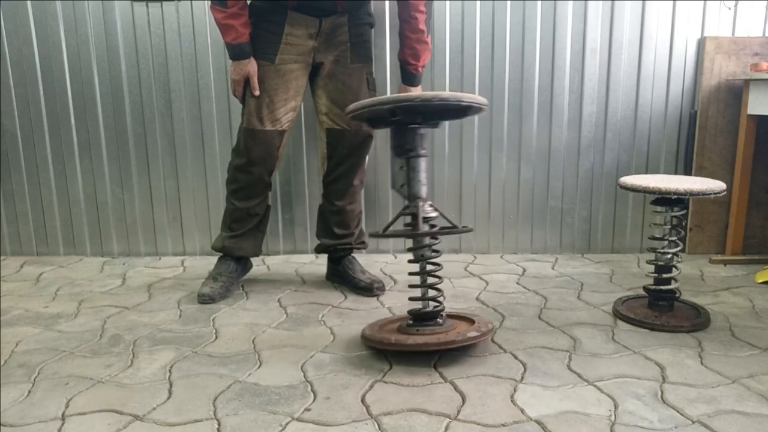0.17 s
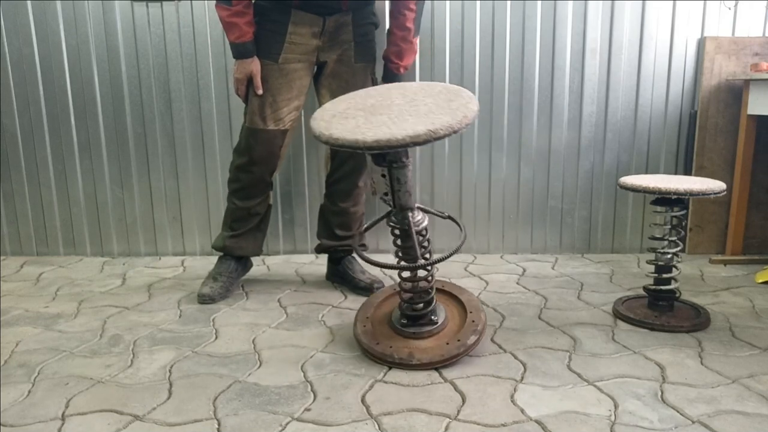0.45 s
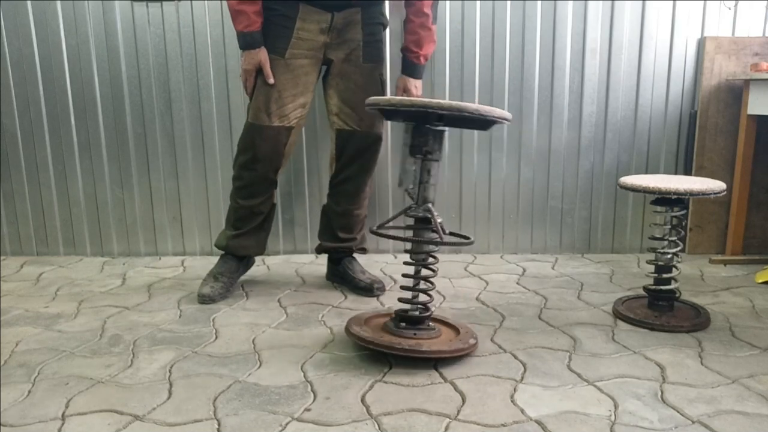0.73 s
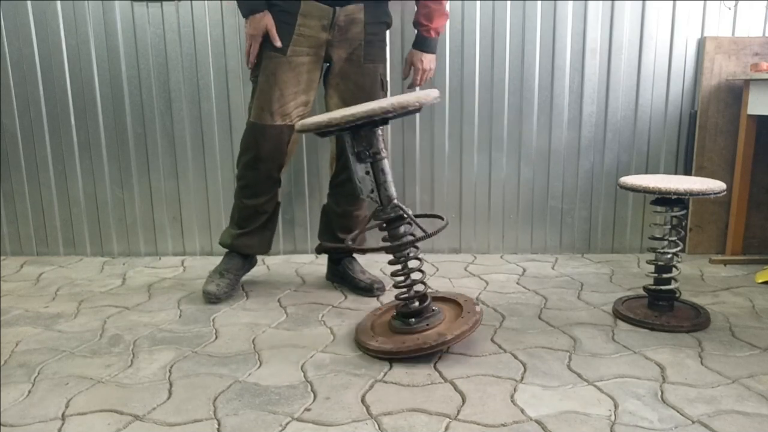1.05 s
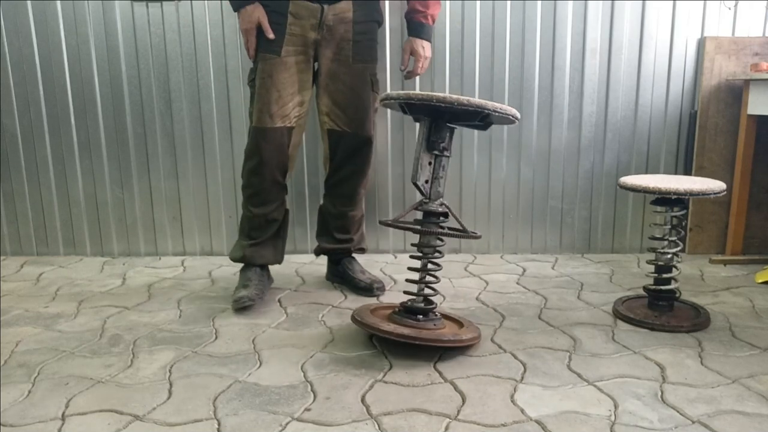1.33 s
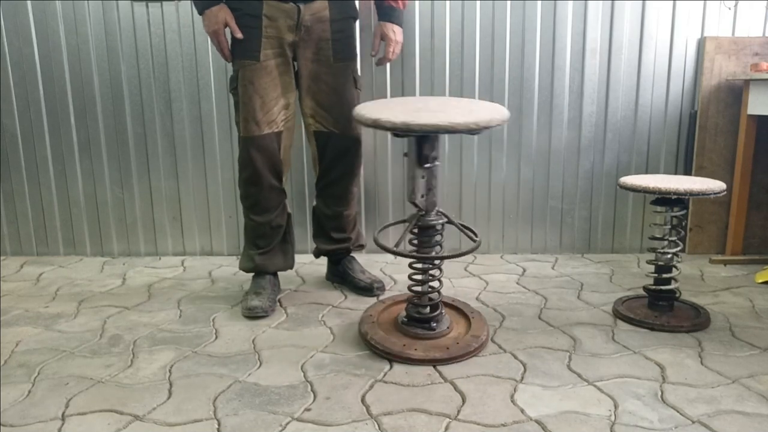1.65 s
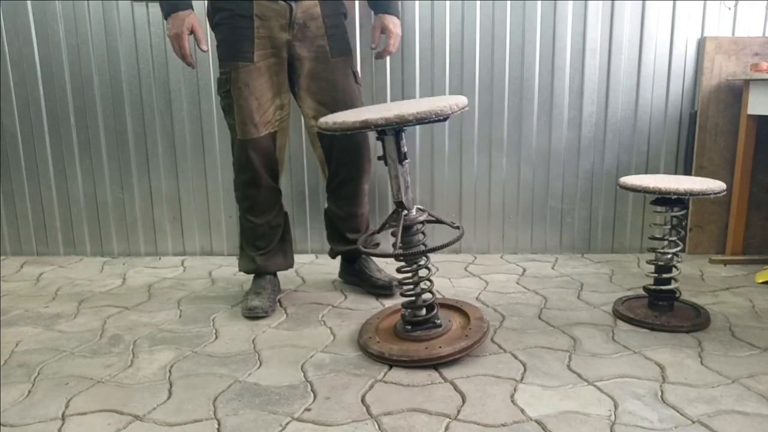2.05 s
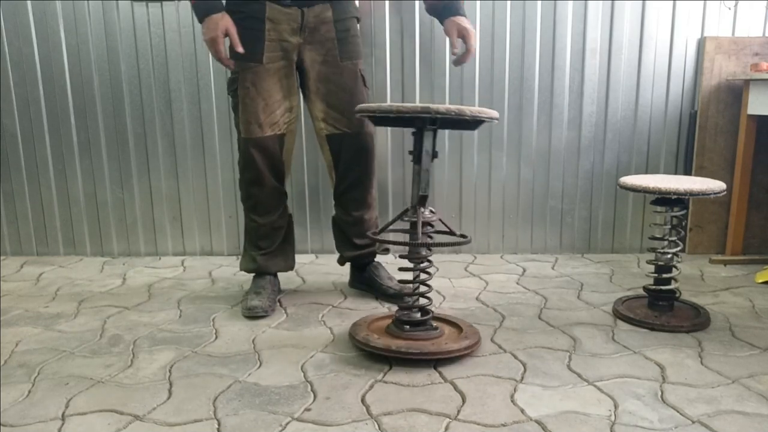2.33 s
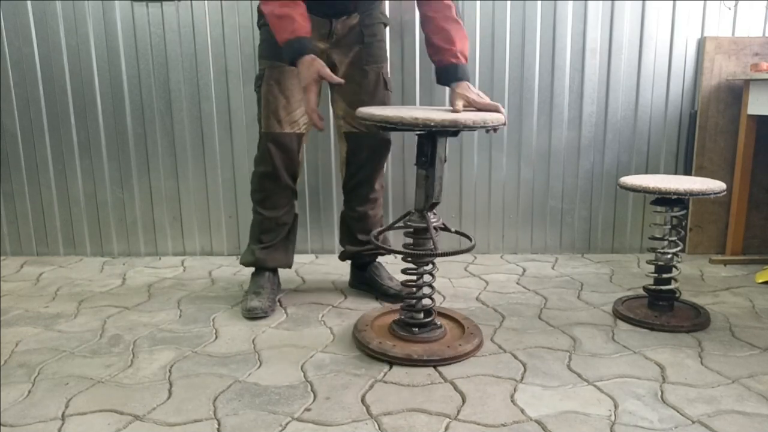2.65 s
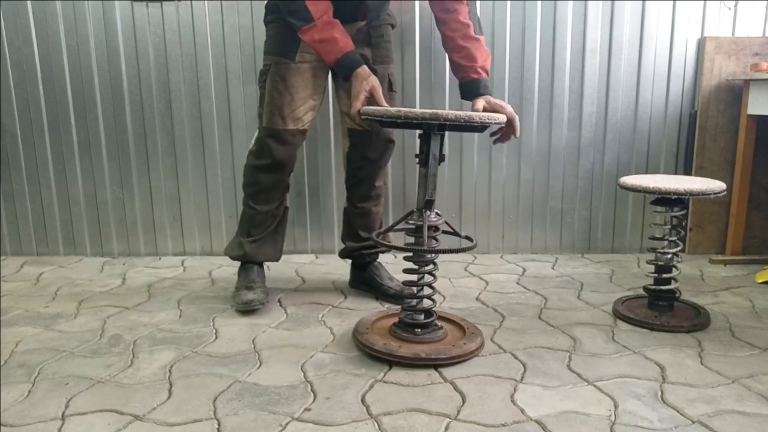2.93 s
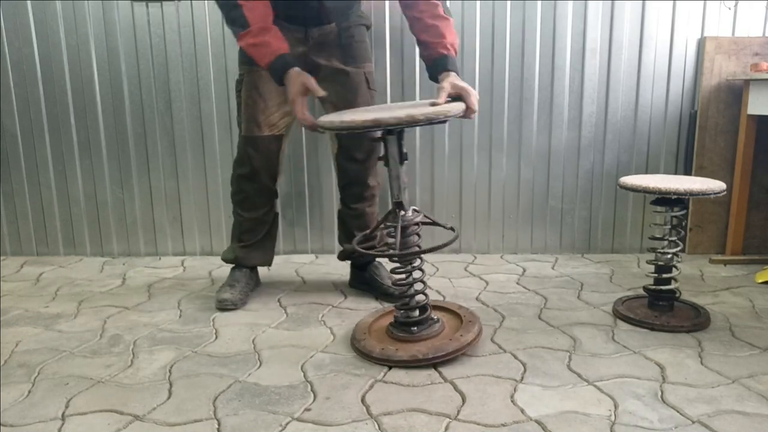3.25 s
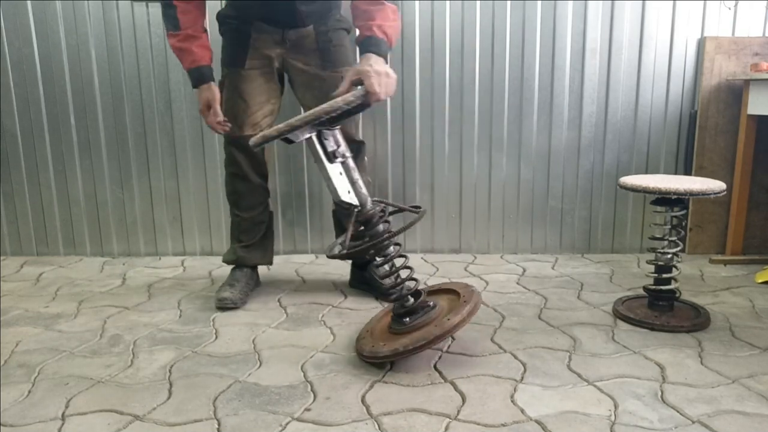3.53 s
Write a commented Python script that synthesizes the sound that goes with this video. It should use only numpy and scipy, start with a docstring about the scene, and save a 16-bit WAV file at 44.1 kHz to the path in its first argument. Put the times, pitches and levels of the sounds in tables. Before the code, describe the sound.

A heavy steel disc under a stool wobbles on its rim over concrete paving. After a quieter start, rumble and knocks swell around 0.3 s, crack brightly at 0.8 s, clatter densely at 1.3-1.5 s, and surge at 1.8, 2.1, 2.4 and 2.7-2.9 s, with grit crunch and ringing pings. At 3.2 s loose parts clank harshly, then the ring fades into faint outdoor air. Close, loud, somewhat clipped, with short yard reverberation.

```python
"""A stool on a heavy steel disc wobbles round on its rim over concrete paving in a yard with sheet-metal walls.
The rim rumbles over random tiny bumps and knocks over the joints; short pushes set the disc and frame ringing.
Grains of noise make the crunch of grit, decaying sines the singing disc, and harsh ringing blows the loose parts.
It swells with each swing, and a last clank dies away as the stool is caught and tipped, over faint outdoor noise."""
import sys
import numpy as np
from scipy import signal
from scipy.fft import rfft, irfft, next_fast_len
from scipy.io import wavfile

SR = 44100
rng = np.random.default_rng(int(sys.argv[2]) if len(sys.argv) > 2 else 0)


def waveform_to_disk(signal):
    """Save audio, clipped to [-1, 1], as 16-bit WAV at the path in sys.argv[1]."""
    frames = np.transpose(np.atleast_2d(signal))
    scaled = np.clip(frames, -1, 1) * 32767
    samples = np.round(scaled).astype(np.int16)
    wavfile.write(sys.argv[1], SR, samples)


N = 160965   # length of the sound in samples
LEAD_S = .2   # run-up made ahead of the start, so that earlier contacts can ring on into it
SPAN = next_fast_len(N + int(1.6 * SR))   # working length in samples, with room for run-up and tails
KNOCK_S = 0.052   # time over which the level of a knock or clank is counted


def from_db(db):
    """Turn decibels into a gain."""
    return 10 ** (np.asarray(db) / 20)


def rms_one(x):
    """Scale to an average power of one."""
    return x / np.sqrt(np.mean(np.abs(x) ** 2) + 1e-20)


def bins(size):
    """Frequencies of a spectrum in Hz, none below 1 so that their logarithm exists."""
    return np.maximum(np.arange(size // 2 + 1) * SR / size, 1)


def at_hz(points, hz):
    """Read a curve of (frequency, value) points on a logarithmic frequency axis."""
    point_hz, values = np.transpose(points)
    return np.interp(np.log(hz), np.log(point_hz), values)


def in_time(rows):
    """Read each column of a curve over time at every sample, run-up included."""
    row_s, *columns = np.transpose(rows)
    time_s = np.arange(SPAN) / SR - LEAD_S
    return [np.interp(time_s, row_s, column) for column in columns]


def sample_at(time_s):
    """Place of a moment in the working signal, run-up included."""
    return int((time_s + LEAD_S) * SR)


def causal(db):
    """Minimum-phase filter with the given gains: nothing sounds before its cause."""
    cepstrum = irfft(np.log(from_db(db)))
    half = len(cepstrum) // 2
    # folding the second half onto the first gives the phase that belongs to these gains
    cepstrum[1:half] *= 2
    cepstrum[half + 1:] = 0
    return np.exp(rfft(cepstrum))


def grains(per_s, spread_db):
    """Clicks of uneven size and random sign at random moments, scaled to unit power."""
    boost_db = spread_db * np.minimum(rng.exponential(1, SPAN), 4)
    sizes = from_db(boost_db) * rng.choice([-1, 1], SPAN)
    return rms_one(sizes * (rng.random(SPAN) < per_s / SR))


def coloured(x, points):
    """Filter a signal with a frequency curve, then scale it to unit power."""
    return rms_one(irfft(rfft(x) * causal(at_hz(points, bins(SPAN))), SPAN))


def response(colour, modes):
    """A steel part's broad colour, shaped further by its narrow resonances."""
    hz = bins(SPAN)
    out = causal(at_hz(colour, hz))
    for centre_hz, width_hz, height_db in modes:
        resonance = 1 / (1 + 1j * (hz ** 2 - centre_hz ** 2) / (hz * width_hz))
        out = out * (1 + (from_db(height_db) - 1) * resonance)
    return rms_one(out)


def dying_noise(t60_s, build_s):
    """A dense ring as noise that builds up, then falls by 60 dB in t60_s; unit power over a second."""
    t = np.arange(SR) / SR
    return rms_one(rng.standard_normal(SR) * from_db(-60 * t / t60_s) * np.minimum(t / build_s, 1))


def spread():
    """What follows a contact at one place: the frame's dense short ring and the yard's reverberation."""
    frame = from_db(-3) * dying_noise(t60_s=0.14, build_s=0.0011)
    yard = from_db(-4.5) * dying_noise(t60_s=0.86, build_s=0.018)
    return (frame + yard) / np.sqrt(SR)


def outdoor_air():
    """The faint outdoor background: steady noise, strongest in the bass."""
    # colour of the background: hz [Hz], relative_level_db [dB]
    air_colour = [(25, -21), (60, -2.5), (100, 7.5), (300, 0), (1000, -10), (4000, -37.5), (9000, -44),
                  (16000, -36)]
    return from_db(-45) * coloured(rng.standard_normal(SPAN), air_colour)


def grit():
    """Fine crunch of sand under the rim: thousands of tiny clicks a second, rising and falling."""
    # sand crushed under the rim: time_s [s], relative_level_db [dB]
    grit_levels = [(0.0, -52), (0.03, -62), (0.25, -58.5), (0.28, -48), (0.29, -52), (0.4, -45),
                   (0.58, -59), (0.7, -57), (0.72, -50), (0.82, -41.5), (0.94, -46.5), (1.09, -40),
                   (1.28, -52.5), (1.29, -41), (1.59, -54), (1.61, -44), (1.78, -51.5), (1.79, -50.5),
                   (1.98, -54.5), (2.02, -58), (2.03, -48), (2.04, -76), (2.07, -40), (2.33, -54.5),
                   (2.4, -43), (2.44, -50.5), (2.74, -39), (2.95, -42), (3.13, -53), (3.16, -46),
                   (3.19, -43), (3.39, -55), (3.61, -63), (3.65, -44)]
    # its colour: hz [Hz], relative_level_db [dB]
    grit_colour = [(1500, -16.5), (3000, 6), (4500, 1.5), (5100, -11), (5550, 3), (5950, -5), (6700, 6),
                   (7000, 2.5), (7300, 6.5), (7600, 3.5), (7750, -10), (8450, -5.5), (8650, -34),
                   (11300, -37), (12000, -15.5), (16000, -20.5)]
    level_db, = in_time(grit_levels)
    crunch = coloured(grains(per_s=7000, spread_db=4), grit_colour)
    return from_db(level_db - 0.5) * crunch


def pings():
    """Edge-on touches set the disc's high partials singing: dying sines, mixed differently each time."""
    # touches: start_s [s], relative_level_db [dB], extra level of the two lowest partials low_db [dB]
    touches = [(.234, -39, -5), (.279, -44, 15), (.805, -36, 7), (1.398, -40, 16.5), (1.601, -41, -6),
               (1.784, -36, -9), (2.03, -34, 1.5), (2.406, -37, 5.5)]
    # partials of the disc: hz [Hz], relative_level_db [dB], time to fall by 60 dB t60_s [s]
    partials = [(2625, -0.5, 0.66), (2696, -3.5, 0.86), (3965, -4, .6), (3980, -3, 0.4), (4600, -12, .6),
                (5580, -20.5, .6), (6650, -19.5, .6), (7280, -18.5, 0.49)]
    spread_db, attack_s = 2, .002
    out = np.zeros(SPAN)
    t = np.arange(SR) / SR
    attack = np.minimum(t / attack_s, 1)
    for start_s, level_db, low_db in touches:
        start = sample_at(start_s)
        for k, (hz, partial_db, t60_s) in enumerate(partials):
            strength_db = level_db + partial_db + low_db * (k < 2) + spread_db * rng.standard_normal()
            fading = from_db(strength_db - 60 * t / t60_s)
            out[start:start + SR] += fading * np.sin(2 * np.pi * hz * t) * attack
    return out


def clanks():
    """Loose steel parts under the seat clank as it is caught and tipped: blows with a harsh, wide ring."""
    # blows: start_s [s], level_db [dB]
    blows = [(2.879, -16), (3.168, -21.5), (3.177, -8.5), (3.183, -17), (3.209, -14.5), (3.243, -17),
             (3.297, -22.5), (3.382, -32), (3.431, -35.5)]
    # broad colour of the loose parts: hz [Hz], relative_level_db [dB]
    clank_colour = [(24, -80.5), (40, -56), (86, -19.5), (156, -16), (187, -13), (294, -13.5), (329, -15),
                    (462, -2), (815, -11), (955, -9.5), (1050, -10), (1610, -6), (1800, -18.5),
                    (2060, -15.5), (2420, -20), (2650, -13.5), (3100, -28.5), (4560, -25), (5220, -46.5),
                    (7340, -41.5), (9000, -66), (11700, -93), (19800, -120)]
    # their resonances: centre_hz [Hz], width_hz [Hz], height_db [dB]
    clank_modes = [(454.4, 22, 4.5), (612, 19, 6.5), (980, 36, 8), (1380, 26, 0), (1602, 25, 4),
                   (2582, 53, 10.5)]
    click_db = -11   # the first impact, ahead of the ring
    sound = 0
    for start_s, level_db in blows:
        blow = np.zeros(SPAN)
        blow[sample_at(start_s)] = from_db(level_db) * np.sqrt(KNOCK_S * SR)
        sound = sound + rfft(blow) * (from_db(click_db) + rfft(spread(), SPAN))
    # the added end point holds the colour flat above 11 kHz
    colour = list(clank_colour) + [(11000, -82.5)]
    return irfft(sound * response(colour, clank_modes), SPAN)


def rolling_force():
    """The rim rides over tiny bumps, its loudness and its treble each changing over time."""
    # the rim rolling on the stone: time_s [s], level_db [dB], treble gain bright_db [dB]
    rolling = [(0, -38.5, -3), (.14, -43.5, -3), (.16, -19, -22), (.22, -22.5, -22.5), (.30, -20.5, 5.5),
               (.35, -11.5, -0.5), (.43, -11, -1.5), (.50, -20.5, 1), (.58, -34, -0.5), (.70, -37.5, 4),
               (.76, -12, 0), (.83, -20.5, -0.5), (.94, -26, 2.5), (1.0, -10, -0.5), (1.09, -13.5, -2),
               (1.15, -16, -3), (1.27, -18, -10.5), (1.33, -13, 4.5), (1.43, -23.5, 0.5), (1.52, -19.5, 3),
               (1.59, -27, 3.5), (1.67, -9.5, -14.5), (1.76, -10.5, -16.5), (1.83, -7.5, -15),
               (1.88, -23.5, -10), (2.02, -21.5, -15), (2.08, -8, -1.5), (2.15, -14, 1), (2.23, -26.5, 4.5),
               (2.32, -33.5, 6), (2.40, -17, 5), (2.48, -25, 1.5), (2.58, -15, 3.5), (2.68, -7.5, -9),
               (2.79, -8, -7), (2.91, -12.5, -1.5), (3.0, -26, 3), (3.14, -37.5, 9.5), (3.21, -25, 4),
               (3.30, -36, -1.5), (3.42, -40.5, 0), (3.52, -62, 10), (3.65, -36, -2)]
    level_db, bright_db = in_time(rolling)
    before_end = np.arange(SPAN) < N + LEAD_S * SR
    bumps = grains(per_s=900, spread_db=3) * from_db(level_db) * before_end
    # share of the treble: none below 560 Hz, all above 1140 Hz
    treble_share = at_hz([(560, 0), (1140, 1)], bins(SPAN))
    treble = irfft(rfft(bumps) * treble_share, SPAN)
    return bumps + (from_db(bright_db) - 1) * treble


def knock_force(level_db, thud_db, clang_db, ring_db, ping_db, size=2048):
    """One short push, coloured by how and where the rim lands."""
    colour = [(190, thud_db), (420, 0), (960, 0), (1700, clang_db),   # frequencies in Hz
              (2745, ring_db), (3470, ping_db), (4830, ping_db), (7000, 0)]
    push = irfft(causal(level_db + at_hz(colour, bins(size))))
    return push * np.sqrt(KNOCK_S * SR)


def stool(places=12):
    """Bumps and knocks fall on places round the rim; each place spreads differently, all share the resonances."""
    # the rim knocks on joints and the frame clatters: start_s [s], level_db [dB], thud_db [dB], clang_db [dB],
    # ring of the rim ring_db [dB], high ping ping_db [dB], extra snap of the first impact snap_db [dB]
    knocks = [(-.07, -18, -2.5, -6.5, -4.5, -16.5, 4), (.154, -26.5, 0.5, -6.5, -5.5, -7, -3),
              (.233, -14.5, -3.5, -8.5, -8, -3, 4), (.279, -18.5, -0.5, 10.5, 7, -6, 4),
              (.339, -14, 1, -5, -1, -12, -3.5), (.396, -18, 2.5, 11, 5.5, -2, -13),
              (.542, -31, -6, 15.5, -14, -6.5, -0.5), (.713, -13.5, -0.5, 1, 5.5, 0, -6.5),
              (.756, -16, 16, -16.5, -7, -4.5, -1), (.804, -7, -6, 1, 8.5, 6.5, -5),
              (.820, -18, 1, -3, -3, -0.5, -18), (.852, -16, -5.5, 9, 11, 8, -4.5),
              (.867, -20, -16.5, 7.5, -6.5, -5.5, -5.5), (.910, -23.5, -3.5, 15, 5.5, 11, 5.5),
              (.961, -19.5, -3.5, -5.5, -1.5, 1.5, -7), (1.024, -23.5, -7, -1.5, -8, -4.5, -11.5),
              (1.076, -15, 11, -12, -16, -3.5, -9.5), (1.140, -26, 3.5, -9, -4.5, 1, -2.5),
              (1.168, -23, 8.5, 1.5, -8, -6.5, -4.5), (1.290, -10, 5.5, 4, -4, 2, -4.5),
              (1.331, -9.5, -2, -5.5, -0.5, -6.5, -9.5), (1.378, -10.5, -11.5, 1.5, 7.5, 6.5, -20),
              (1.398, -18, -11.5, -1.5, 10.5, 3.5, -6), (1.421, -19, -5.5, 7, 17, 1.5, -2),
              (1.454, -22.5, -10, 7, 16, 4, -17), (1.505, -19.5, -18, 2.5, 7.5, 0, -22),
              (1.602, -24, 3.5, -7, 5, 5, -3), (1.785, -17, -11.5, 1, 4, 7, -11),
              (2.031, -15.5, -2.5, 6.5, -0.5, 3, 3.5), (2.058, -16.5, -1.5, 6.5, -16, -10, -1.5),
              (2.118, -13, -4, -4, -4.5, -8, 1.5), (2.151, -18, -1.5, 10, -8, -3, -2.5),
              (2.341, -17, 14.5, -3, 0, 3, -14), (2.385, -12.5, 3.5, 2.5, 10, 11, -3),
              (2.406, -10.5, -16, -1, 7.5, 2.5, -4), (2.425, -17, -3, -0.5, 4, -5, 0.5),
              (2.488, -20.5, -16, 11, 2.5, -1, 4.5), (2.569, -22, 3, 8.5, -8, 12, -0.5),
              (2.640, -16.5, 6.5, 4, -13, -5, -2), (2.683, -11.5, 5.5, -16, -3.5, -10, -17),
              (2.772, -11, 4, -14, -13, -11, -12), (2.819, -16, -25, 9, -3, -9, 2.5),
              (2.846, -19, 0, 9, -4, 3, -4), (2.880, -23, 2, 8, -15, 12, -6.5),
              (2.915, -22, -11, 13.5, 12.5, 19, -12)]
    # broad response of the stool to a tap on its rim: hz [Hz], relative_level_db [dB]
    body = [(25, -46), (50, -34.5), (70, -28), (100, -12), (150, -14.5), (200, -6), (300, -6), (400, -1),
            (520, 0.5), (740, -5), (900, 3), (1020, 1.5), (1330, -11.5), (1600, -5.5), (1780, -6),
            (2000, -17.5), (2250, -26.5), (2700, -23.5), (3000, -35), (3700, -29.5), (4300, -38),
            (4600, -33.5), (5000, -49), (7500, -52.5), (9000, -69.5), (16000, -79)]
    # resonances of disc, spring and frame: centre_hz [Hz], width_hz [Hz], height_db [dB]
    stool_modes = [(209.7, 24, 1.5), (265, 4, 7.5), (290.8, 9.1, 8.5), (360, 8.8, 1.5), (461.9, 14.3, 13.5),
                   (497.6, 4.2, 8.5), (550.6, 17, 4), (651.2, 11.1, 9), (824, 4.1, 3.5), (965.3, 6.7, 8),
                   (1094, 10, 4), (1183, 13, 7), (1656, 11, 6.5), (2572, 22, 12), (2647, 50, 10),
                   (2700, 23, 7.5), (3700, 36, -1.5), (3994, 80, 10.5), (4470, 36, 0), (4570, 30, 6.5)]
    click_db = -6   # the first impacts, ahead of the ring
    impacts = rolling_force()
    place_of_bump = rng.integers(0, places, SPAN)
    forces = impacts * (place_of_bump == np.arange(places)[:, None])
    for k, (start_s, *blow, snap_db) in enumerate(knocks):
        push = knock_force(*blow)
        start = sample_at(start_s)
        end = start + len(push)
        forces[k % places, start:end] += push
        impacts[start:end] += from_db(snap_db) * push
    sound = from_db(click_db) * rfft(impacts)
    for force in forces:
        sound = sound + rfft(force) * rfft(spread(), SPAN)
    return irfft(sound * response(body, stool_modes), SPAN)


def scene():
    """Stool, clanks, pings, grit and the outdoor background, with the run-up cut off."""
    mix = stool() + clanks() + pings() + grit() + outdoor_air()
    return mix[int(LEAD_S * SR):][None, :N]


def follow(x, seconds):
    """Follow a signal smoothly, with the given time constant."""
    keep = np.exp(-1 / (seconds * SR))
    return signal.lfilter([1 - keep], [1, -keep], x)


def limiter(x):
    """Turns the loudest moments down; too slow to catch the sharpest cracks."""
    limit_rms, sense_s, attack_s, release_db_per_s = .46, .003, 0.0011, 249.5
    power = follow(x ** 2, sense_s)
    over_db = 10 * np.log10(np.maximum(power / limit_rms ** 2, 1))
    # hold each peak of the excess, then let it fall at a steady rate
    fall_db = release_db_per_s * np.arange(N) / SR
    held_db = np.maximum.accumulate(over_db + fall_db, axis=-1) - fall_db
    return x * from_db(-follow(held_db, attack_s))


def record(dry):
    """A limiter holds the level, peaks beyond full scale clip, and what lies above 16 kHz is cut."""
    clipped = np.clip(limiter(dry), -1, 1)
    low_pass = signal.ellip(10, .1, 70, 16000, fs=SR, output="sos")
    return signal.sosfilt(low_pass, clipped)


dry = scene()
out = record(dry)
waveform_to_disk(out)
```